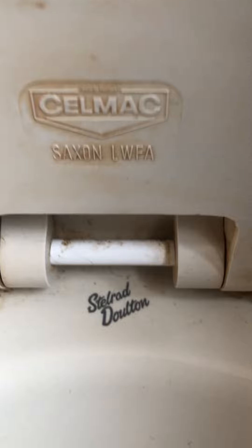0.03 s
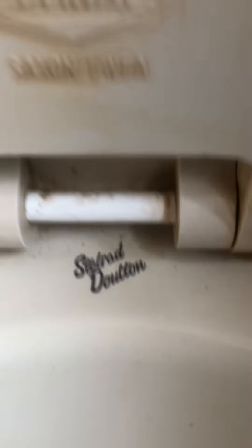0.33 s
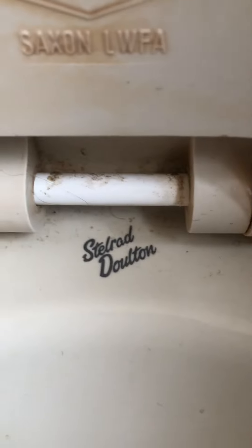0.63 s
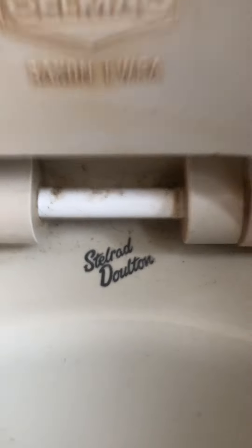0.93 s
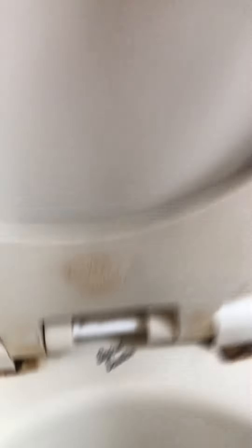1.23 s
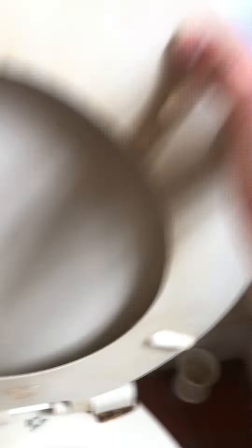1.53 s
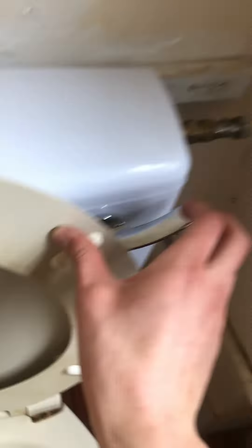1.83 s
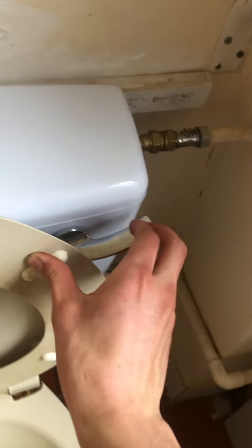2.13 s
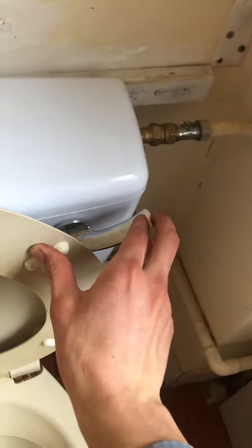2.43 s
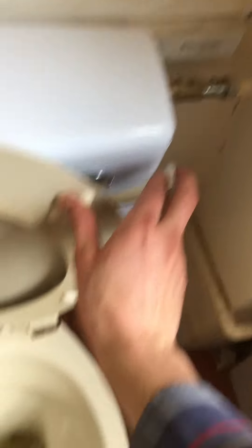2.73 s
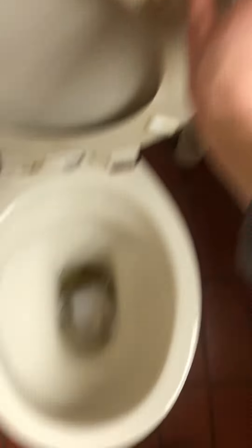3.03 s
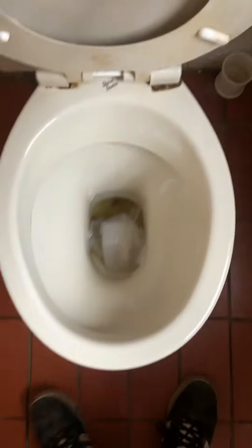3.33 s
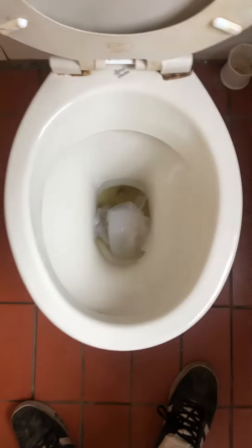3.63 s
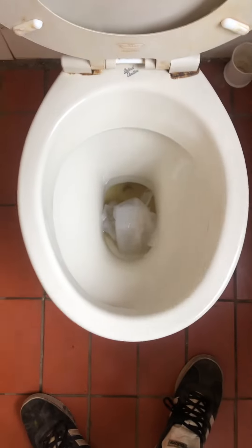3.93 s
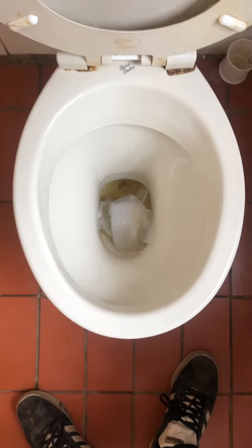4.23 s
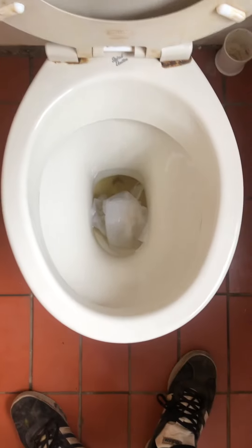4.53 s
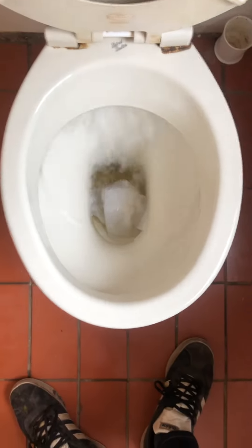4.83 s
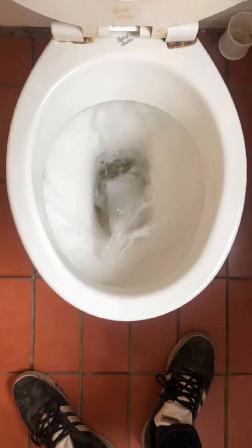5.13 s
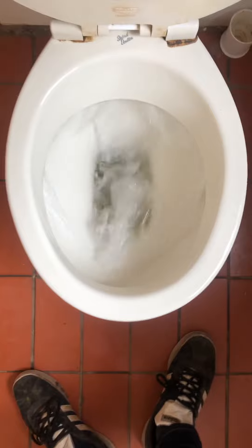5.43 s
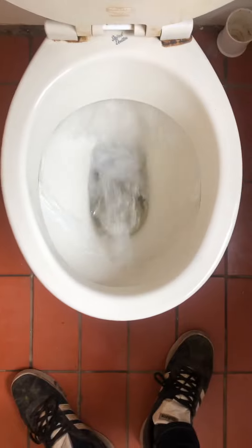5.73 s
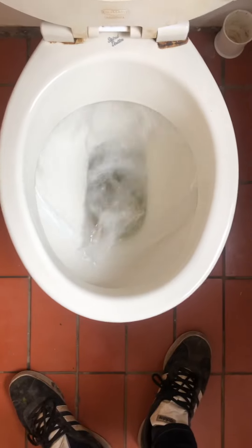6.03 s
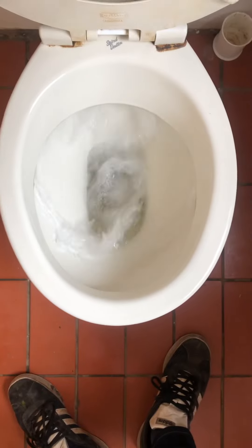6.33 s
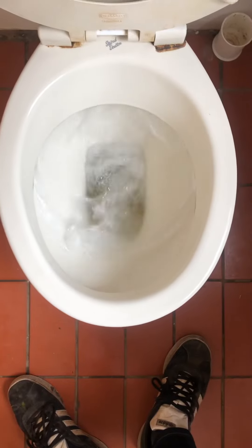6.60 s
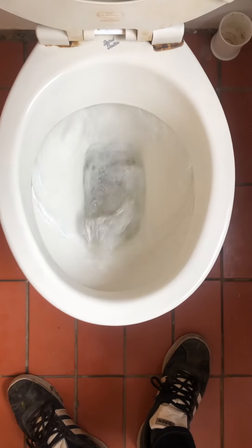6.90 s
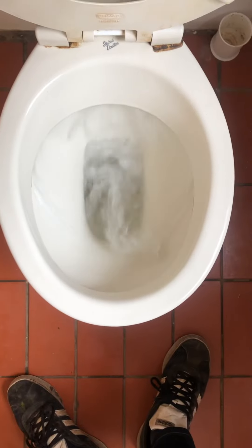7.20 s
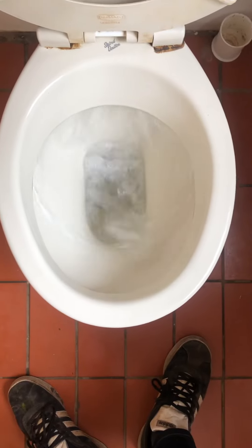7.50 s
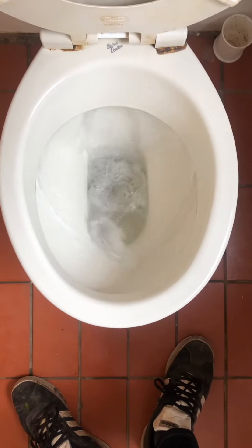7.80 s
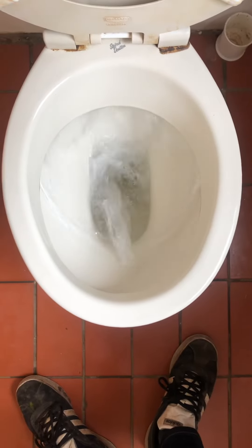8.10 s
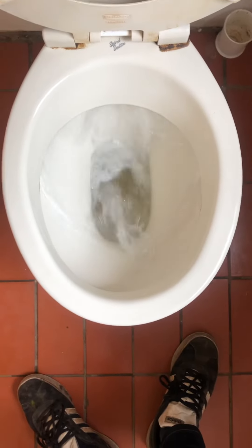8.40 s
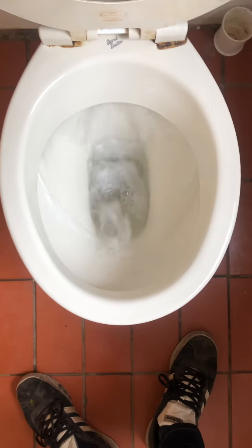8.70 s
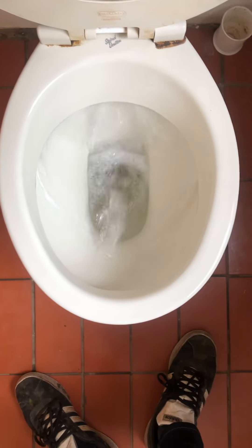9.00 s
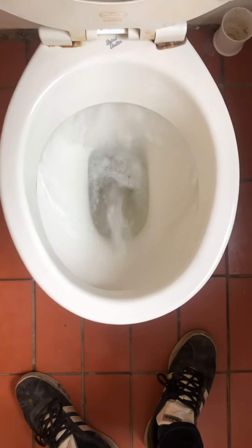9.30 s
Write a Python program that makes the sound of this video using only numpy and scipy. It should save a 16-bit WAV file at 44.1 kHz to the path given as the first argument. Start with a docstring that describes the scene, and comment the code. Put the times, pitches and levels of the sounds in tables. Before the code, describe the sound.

A toilet seat is raised with a short clatter, followed by a loud, gurgling flush in a small tiled room.

```python
"""A small tiled room with a toilet. A sleeve rustles as the plastic seat is lifted and knocks against
the cistern. Then the flush is pulled: the lever clicks, the mechanism clunks on the full tank, and air
rumbles and glugs out of the flush pipe. Water rushes round the china bowl, spraying from the rim,
churning into bubbles in the trap and sounding the bowl's hollow tone; it eases as the cistern drains."""
import sys
import numpy as np
from scipy import signal
from scipy.fft import rfft, irfft, next_fast_len
from scipy.io import wavfile
from scipy.ndimage import uniform_filter1d

SR = 44100
rng = np.random.default_rng(int(sys.argv[2]) if len(sys.argv) > 2 else 0)


def int16_out(signal):
    """Quantize to a 16-bit WAV file."""
    q = np.round(np.clip(np.atleast_2d(signal).T, -1, 1) * 32767)
    wavfile.write(sys.argv[1], SR, q.astype(np.int16))


N = 421155
TIME = np.arange(N) / SR


def amp(db):
    """Decibels to gain."""
    return 10 ** (np.asarray(db) / 20)


def unit(x):
    """Scales to rms 1."""
    return x / np.sqrt(np.mean(x ** 2) + 1e-20)


def peaked(x):
    """Scales to peak 1."""
    return x / abs(x).max()


def since(s):
    """Seconds gone by since time s; zero before it."""
    return np.maximum(TIME - s, 0)


def add(mix, s, sound):
    """Mixes a sound in at time s."""
    part = mix[max(round(s * SR), 0):][:len(sound)]
    part += sound[:len(part)]


def curve_at(points, hz):
    """Reads a curve on a log-frequency axis."""
    point_hz, value = np.transpose(points)
    return np.interp(np.log(hz + 1), np.log(point_hz), value)


def colour(x, eq):
    """Shapes a sound with an EQ curve; rms 1."""
    size = next_fast_len(len(x))
    gain = amp(curve_at(eq, np.fft.rfftfreq(size, 1 / SR)))
    return unit(irfft(rfft(x, size) * gain, size)[:len(x)])


def band(x, hz, kind="band"):
    """A gentle band-, low- or high-pass filter."""
    return signal.sosfilt(signal.butter(2, hz, kind, fs=SR, output="sos"), x)


def resonance(x, hz, width):
    """What a cavity picks out of a noise; rms 1."""
    nearby = band(x, [hz * 0.882, hz * 1.19])
    return unit(signal.lfilter(*signal.iirpeak(hz, hz / width, fs=SR), nearby))


def burst(t60):
    """A puff of noise that dies by 60 dB in t60 seconds."""
    t = np.arange(SR // 2) / SR
    return rng.standard_normal(len(t)) * amp(-60 * t / t60)


def ring(modes, detune):
    """Decaying modes of a struck body, each slightly detuned at random."""
    t = np.arange(SR // 2) / SR
    return sum(amp(db - 60 * t / t60) * np.sin(2 * np.pi * hz * (1 + detune * rng.standard_normal()) * t)
               for hz, db, t60 in modes)


def surge(rate, depth_db):
    """A gain that wanders at random, about rate times a second."""
    knots = rng.standard_normal(N // 64)
    return amp(depth_db * np.interp(TIME * rate, np.arange(len(knots)), knots))


def patchy(x, depth_db, bins):
    """Adds grain: lifts and drops random patches of the spectrum, each some 10 ms long."""
    spectra = signal.stft(x, nperseg=256)[2]
    patches = uniform_filter1d(rng.standard_normal(spectra.shape), bins, axis=0)
    patches = unit(uniform_filter1d(patches, size=4, axis=1))
    return signal.istft(spectra * amp(depth_db * patches), nperseg=256)[1][:N]


# The reverb of the tiles. Each row: frequency in Hz, time to fall 60 dB in seconds.
ROOM_DECAY = [(100, 0.48), (500, 0.66), (2000, 0.87), (6000, 0.83), (16000, 0.045)]


def room(x, wet_db):
    """Tiled walls: a dense tail, each band dying at its own speed."""
    echoes = rng.standard_normal(SR // 2) * (rng.random(SR // 2) < .15)
    echoes[:round(.004 * SR)] = 0  # pre-delay
    hz, t, spectra = signal.stft(echoes, SR, nperseg=256)
    decay = amp(-60 * t / curve_at(ROOM_DECAY, hz)[:, None])
    tail = signal.istft(spectra * decay, SR, nperseg=256)[1]
    return x + amp(wet_db) * signal.oaconvolve(x, tail / np.linalg.norm(tail))[:N]


# The dark tone of the room's air. Each row: frequency in Hz, gain in dB.
AIR_EQ = [(25, -29), (45, -2), (65, 2.5), (120, 2), (200, 0.5), (450, -5), (600, -9), (1000, -12),
          (1400, -18.5), (2500, -20.5), (4200, -22), (15000, -28.5)]


def room_tone(hum_hz=118.4):
    """Quiet room air with a faint hum."""
    air = colour(rng.standard_normal(N), AIR_EQ)
    hum = np.sqrt(2) * np.sin(2 * np.pi * hum_hz * TIME) * surge(3, depth_db=1.5)
    return amp(-66) * air + amp(-78) * hum


# The tone of rubbing cloth. Each row: frequency in Hz, gain in dB.
CLOTH_EQ = [(200, 3), (500, 7), (800, 4), (1100, 3.5), (1700, 2), (2400, 1.5), (2900, 1), (3500, 5),
            (6000, 3), (9000, -6), (16000, -16.5)]
# Swishes as the arm moves. Each row: fastest moment in seconds, level in dB, rise and fall in seconds,
# treble trim in dB, rasp trim in dB.
SLEEVE_STROKES = [(0.2, -67, 0.28, 0.67, -2, -14), (1.2, -44, 0.24, .14, -0.5, -14),
                  (1.43, -46.5, 0.18, 0.57, -7.5, -11), (1.85, -58, 0.33, 0.94, -2.5, -16),
                  (2.95, -65.5, .5, 0.85, -2.5, -16), (3.226, -55.5, 0.15, .14, 0.5, -1),
                  (3.44, -56, .01, 0.23, 7, -10), (3.55, -57, .15, 0.22, -3, 0.5),
                  (4.24, -64, 0.081, 0.29, -2, -14), (4.373, -35.5, 0.027, 0.18, -9.5, -23)]


def sleeve(swell_db=19):
    """Fibres slide over each other; each stroke climbs and drops swell_db over its rise and fall."""
    rub = colour(patchy(rng.standard_normal(N), depth_db=1.5, bins=6), CLOTH_EQ)
    body_power, treble_power, rasp_power = np.zeros((3, N))
    for s, db, rise, fall, treble_db, rasp_db in SLEEVE_STROKES:
        from_crest = np.maximum((s - TIME) / rise, (TIME - s) / fall)
        power = amp(db - swell_db * np.minimum(from_crest, 10)) ** 2
        body_power += power
        treble_power += power * amp(treble_db) ** 2
        rasp_power += power * amp(rasp_db) ** 2
    body = np.sqrt(body_power) * band(rub, 2730, "low")
    treble = np.sqrt(treble_power) * band(rub, 10300, "high")
    rasp = np.sqrt(rasp_power) * unit(band(rng.standard_normal(N), [2230, 4300]))  # weave pressed hard
    return body + amp(8) * treble + amp(-4.5) * rasp


# Sharp ticks. Each row: start in seconds, dry peak in dB, centre in Hz, 60 dB decay in seconds.
HARDWARE_CLICKS = [(0.889, -47, 7000, 0.041), (1.152, -29.5, 1990, 0.029), (1.181, -25.5, 4200, .03),
                   (1.2588, -28.5, 1880, 0.025), (1.3116, -26, 1660, 0.017), (1.318, -30.5, 3800, 0.056),
                   (1.387, -31.5, 6150, .035), (3.925, -48, 3700, 0.03), (4.351, -54, 6000, 0.043),
                   (4.369, -27.5, 6500, 0.029), (4.429, -20.5, 7560, .05), (4.487, -27, 9200, 0.044),
                   (4.597, -17, 2700, .04), (5.1424, -2, 11800, 0.009)]


def clicks():
    """Play in hinge, lever and valve takes up with short ticks."""
    out = np.zeros(N)
    for s, db, hz, t60 in HARDWARE_CLICKS:
        add(out, s, amp(db) * peaked(band(burst(t60), [hz * 0.6, hz * 1.4])))
    return room(out, wet_db=-13)


# Knocks of seat and hand. Each row: start in seconds, dry peak in dB, ring over thud in dB,
# thud pitch in Hz.
SEAT_KNOCKS = [(0.932, -44.5, 2, 200), (0.95, -47, -21, 76.5), (1.12, -35, -5, 280), (1.158, -27, 0, 282),
               (1.181, -26, 6, 110), (1.203, -21.5, 12, 190), (1.214, -27, 4, 130), (1.232, -24.5, 13, 189),
               (1.259, -19.5, 10, 170), (1.286, -27, 25, 100), (1.312, -21.5, 10, 190),
               (1.319, -24, 12, 242), (1.404, -33, -1, 149), (1.421, -40, -13, 119.6), (1.774, -46, -6, 85),
               (2.079, -49.5, -9, 130), (2.588, -48, -13, 227), (2.613, -47, -15, 153.6),
               (2.68, -53, -16, 151), (2.746, -43, -8, 270), (2.8, -52, -20, 247), (4.307, -45, -13, 253)]
# The seat's hollow ring. Each row: pitch in Hz, level in dB, 60 dB decay in seconds.
SEAT_MODES = [(198, 3.5, 0.11), (382, -21, 0.066), (501.5, 0.5, 0.14), (653, 2, 0.078), (780, 4.5, 0.057),
              (1053, -1, 0.11), (1630, -14, 0.1), (2225, -10, 0.097), (3100, -19, 0.25)]


def seat(clack_db=-6):
    """Each knock rings the seat; soft ones thud, hard ones ring with a plastic clack."""
    out = np.zeros(N)
    for s, db, ring_db, thud_hz in SEAT_KNOCKS:
        # each spot favours other modes
        modes = [(hz, mode_db + 2 * rng.standard_normal(), t60) for hz, mode_db, t60 in SEAT_MODES]
        hollow = peaked(ring(modes, detune=.008) + .6 * band(burst(.06), [350, 1500]))
        thud = peaked(band(burst(.13), [thud_hz * .55, thud_hz * 1.7]))
        clack = peaked(band(burst(.04), [1400, 2700]))
        add(out, s, amp(db) * peaked(thud + amp(ring_db) * (hollow + amp(clack_db) * clack)))
    return room(out, wet_db=-8)


def bubble(hz, cycles, rise):
    """An air bubble swells into ringing and climbs in pitch as it nears the surface."""
    age = np.arange(int(3 * cycles / hz * SR)) / SR * hz / cycles
    envelope = (1 - np.exp(-8 * age)) * np.exp(-2 * age)
    return peaked(envelope * np.sin(2 * np.pi * cycles * (age + rise * age ** 2 / 2)))


# Single bubbles that stand out. Each row: time in seconds, level in dB, pitch in Hz.
GLUG_BUBBLES = [(4.371, -30.5, 244), (4.51, -27, 201), (4.534, -17, 290), (4.559, -13.5, 386),
                (4.62, -13, 305), (4.636, -21.5, 212), (4.674, -13, 467), (4.733, -23, 263),
                (4.827, -13.5, 394), (5.081, -14, 406), (5.084, -14, 287), (5.389, -18, 600),
                (5.749, -44, 150), (6.066, -15, 3390), (6.359, -46, 162), (6.758, -21, 668),
                (6.809, -23, 530), (6.861, -21.5, 3070), (6.897, -16, 3930), (7.212, -25, 558),
                (7.26, -22.5, 625), (7.681, -25.5, 680), (7.81, -18.5, 476), (7.971, -43, 199),
                (8.107, -21.5, 443), (8.291, -20.5, 1010), (8.345, -22.5, 800), (8.577, -28, 422)]


def glugs(shed_within_s=.03):
    """Bubbles break away in pipe and trap, each shedding three smaller, higher ones."""
    out = np.zeros(N)
    for s, db, hz in GLUG_BUBBLES:
        add(out, s - .002, amp(db - 4.5) * bubble(hz, cycles=9.5, rise=0.034))
        for delay, pitch in rng.random((3, 2)):
            small = bubble(hz * (1 + 2 * pitch), cycles=7.9, rise=0.035)
            add(out, s + delay * shed_within_s, amp(db - 13) * small)
    return room(out, wet_db=-6)


# The mechanism hits its stop and rebounds. Each row: start in seconds, level in dB.
MECHANISM_CLUNKS = [(4.4275, -11.5), (4.457, -22), (4.556, -29), (4.612, -24)]
# The tank's ring. Each row: pitch in Hz, level in dB, 60 dB decay in seconds.
CISTERN_MODES = [(104, -19, 0.55), (338, -13, .25), (458.6, 0.5, 0.31), (493, -13, 0.35), (541, -16, 0.47),
                 (840, 2.5, 0.11), (865, 1, 0.062), (1190, -20.5, 0.19), (1464, -27, 0.084),
                 (3120, -26, 0.2), (4190, -12.5, 0.069), (5556, -25, 0.16), (6800, -31, .16),
                 (10100, -18, 0.095)]


def cistern(attack_s=.004):
    """The flush mechanism strikes the water-filled tank, which takes a moment to swing."""
    out = np.zeros(N)
    for s, db in MECHANISM_CLUNKS:
        rattle = amp(1) * band(burst(0.11), [500, 1300])  # loose parts of the linkage
        clunk = rattle + ring(CISTERN_MODES, detune=.002)
        attack = np.minimum(TIME[:len(clunk)] / attack_s, 1)
        add(out, s, amp(db) * clunk * attack)
    return room(out, wet_db=-7.5)


OPEN_S, FULL_S = 4.43, 5.62  # the valve opens; the rim runs full
# The flush pipe's low shudder. Each row: frequency in Hz, gain in dB.
PIPE_EQ = [(25, -17.5), (45, -8), (65, 7), (105, 2), (135, 2), (200, 13.5), (260, 0), (500, -23),
           (1500, -60)]


def pipe(attack_s=0.056, clear_s=5.11, sag_db_per_s=4.5, release_db_per_s=130):
    """Water drives the air out of the pipe with a lumpy rumble that stops once the air is gone."""
    shake_db = -36.5 - sag_db_per_s * since(OPEN_S) - release_db_per_s * since(clear_s)
    attack = np.minimum(since(OPEN_S) / attack_s, 1)
    rumble = unit(colour(rng.standard_normal(N), PIPE_EQ) * surge(25, depth_db=3.5))
    return rumble * attack * amp(shake_db)


# Gushes that break over the pool and gulp in the trap. Each row: start in seconds, rise in seconds,
# rim level in dB, trap level in dB.
WATER_GUSHES = [(4.593, 0.022, -25, -26), (5.07, 0.04, -32, -46), (5.35, 0.035, -34, -29),
                (5.58, 0.043, -38, -32), (6.5, .06, -33.5, -46), (6.72, 0.078, -43, -52),
                (7.18, 0.095, -41, -34), (7.71, 0.056, -37, -30), (8.07, 0.056, -35.5, -38.5),
                (8.9, 0.02, -33.5, -43), (9.23, 0.021, -38, -30.5), (9.45, 0.034, -34, -55)]


def water_flow(settle_db=5, settle_s=1.0, trap_attack_s=0.067):
    """Gains for rim and trap: the rim fills slowly, the trap fast; both ease as the cistern drains."""
    head_db = -settle_db * (1 - np.exp(-since(FULL_S) / settle_s))
    rim_fill = np.minimum(since(OPEN_S) / (FULL_S - OPEN_S), 1) ** 0.54
    trap_fill = np.minimum(since(OPEN_S) / trap_attack_s, 1)
    rim_power = (rim_fill * amp(-30 + head_db)) ** 2
    trap_power = (trap_fill * amp(-31 + 0.62 * head_db)) ** 2
    for s, rise, rim_db, trap_db in WATER_GUSHES:
        age = since(s) / rise
        gush = age * np.exp(1 - np.minimum(age, 20))  # quick swell, slower ebb
        rim_power += (amp(rim_db) * gush) ** 2
        trap_power += (amp(trap_db) * gush) ** 2
    return np.sqrt(rim_power), np.sqrt(trap_power)


def impacts(rate, spread_db):
    """Random impulses, many small and a few large."""
    hits = (rng.random(N) < rate / SR) * rng.choice([-1, 1], N)
    return hits * amp(spread_db * np.minimum(rng.exponential(1, N), 4))


# The bright wash of the spray. Each row: frequency in Hz, gain in dB.
SPRAY_EQ = [(100, -60), (300, -41), (700, -9), (1500, 1.5), (2400, 1.5), (3500, 2), (4500, -1), (6000, 1.5),
            (8000, -0.5), (11000, 0), (16000, -5)]


def spray(flow):
    """The sheet of water from the rim breaks into drops over a fine hiss."""
    splat = burst(0.009)[:SR // 100]  # a drop spatters for a few milliseconds
    drop_power = signal.oaconvolve(impacts(1100, spread_db=3.5) ** 2, splat ** 2)[:N]
    spatter = np.sqrt(abs(drop_power)) * rng.standard_normal(N)
    drops = unit(patchy(spatter, depth_db=3.5, bins=10))
    hiss = unit(patchy(rng.standard_normal(N), depth_db=2.5, bins=8))
    water = colour((drops + amp(-1) * hiss) * surge(70, depth_db=0.84), SPRAY_EQ)
    return amp(1.6) * unit(room(water, wet_db=-12)) * surge(13, depth_db=0.62) * flow


def bubble_swarm(low_hz, high_hz, cycles, spread_db, count):
    """Bubbles of all sizes scattered over the length of the flush; rms 1."""
    swarm = np.zeros(N)
    for when, pitch, strength, life in rng.random((count, 4)):
        hz = low_hz * (high_hz / low_hz) ** pitch
        s = OPEN_S + when * (TIME[-1] - OPEN_S)
        db = spread_db * min(-np.log(strength), 3)
        add(swarm, s, amp(db) * bubble(hz, cycles * (.5 + life), rise=.03))
    return unit(swarm)


# The throaty tone of the trap. Each row: frequency in Hz, gain in dB.
CHURN_EQ = [(40, -50), (90, -33), (150, -22), (230, 1.5), (350, -1), (450, -18), (560, 1.5), (850, 6),
            (970, 4.5), (1100, 5.5), (1500, 8.5), (1950, 3), (2400, 6.5), (4000, -10), (8000, -26),
            (16000, -40)]
# Air resonances of the bowl. Each row: centre in Hz, width in Hz, level in dB.
BOWL_RESONANCES = [(458, 270, 0), (695, 15, -12.5), (823, 16, -7.5)]


def churn(flow):
    """The streams meet in the trap and fold in air: a swarm of bubbles that also sounds the bowl."""
    swarm = bubble_swarm(360.5, 4655, cycles=8.7, spread_db=4.5, count=6500)
    froth = swarm + amp(3) * rng.standard_normal(N)
    froth = room(froth * surge(30, depth_db=1.7), wet_db=-9.5)
    hollow = sum(amp(db) * resonance(froth, hz, width) for hz, width, db in BOWL_RESONANCES)
    return (amp(-5.5) * colour(froth, CHURN_EQ) + amp(-16.5) * hollow) * surge(9, depth_db=0.5) * flow


def slosh(flow):
    """The pool heaves slowly under the streams."""
    heave = unit(band(rng.standard_normal(N), [148, 238]))
    return amp(-33) * heave * surge(3, depth_db=2) * flow


def plinks(flow):
    """Small bubbles at the surface ring briefly above the rush."""
    small = bubble_swarm(1400, 7500, cycles=20, spread_db=4.5, count=600)
    return amp(-10) * room(small, wet_db=-11) * flow


# The fader ride on the bowl's hollow tone as water pours in. Each row: time in seconds, level in dB.
BOOM_FADER = [(4.45, -40), (4.58, -31), (5.06, -44.5), (5.09, -47), (5.19, -41), (5.54, -55), (5.9, -42),
              (6.38, -59), (6.62, -46), (7.64, -51), (7.7, -37), (8.03, -49.5), (8.11, -40), (8.26, -57),
              (8.36, -41.5), (9.04, -47.5), (9.51, -42), (9.55, -50)]


def bowl_boom():
    """The lowest air resonance of the bowl drones, over a broader wallowing of the water."""
    drone = resonance(rng.standard_normal(N), hz=300, width=10)
    swing = abs(signal.hilbert(drone))
    drone = unit(drone / np.sqrt(2 + swing ** 2))  # losses grow with the swing and steady it
    wallow = resonance(rng.standard_normal(N), hz=278, width=23)
    times, db = np.transpose(BOOM_FADER)
    return (drone + amp(-7.5) * wallow) * amp(np.interp(TIME, times, db, left=-120))


# Wet slaps above the rush. Each row: start in seconds, level in dB, treble trim in dB.
WATER_SLAPS = [(4.5979, -6, -3), (4.611, -13, -27), (4.8035, -13, 3), (4.8903, -26, -7), (4.9114, -11, -15),
               (4.9443, -10.5, -7), (5.28, -12, -10), (6.0637, -15.5, -14), (6.48, -12.5, 3),
               (7.7442, -19, -15), (7.7643, -30, -17), (7.8003, -15, -6), (8.766, -12, 5),
               (9.0035, -19.5, -11)]


def splashes():
    """Slugs of water slap the china and scatter."""
    out = np.zeros(N)
    for s, db, treble_db in WATER_SLAPS:
        slap = burst(.055)
        body = band(slap, [900, 4500])
        treble = amp(treble_db + 3.5) * band(slap, 2900, "high")
        add(out, s, amp(db - 0.5) * peaked(body + treble))
    return room(out, wet_db=-12)


def scene():
    """Everything at one microphone above the bowl."""
    handling = sleeve() + clicks() + seat()
    rim, trap = water_flow()
    release = glugs() + cistern() + pipe()
    rush = spray(rim) + churn(trap) + slosh(trap) + plinks(rim) + bowl_boom() + splashes()
    return (room_tone() + handling + release + rush)[None]


def record(dry, low_cut_hz=50, high_cut_hz=16050):
    """A small microphone loses the deepest bass; a steep filter takes off the very top."""
    thin = signal.sosfilt(signal.butter(4, low_cut_hz, "high", fs=SR, output="sos"), dry)
    high_cut = signal.firwin(511, high_cut_hz, window=("kaiser", 9), fs=SR)
    return signal.oaconvolve(thin, high_cut[None], "same")


dry = scene()
out = record(dry)
int16_out(out)
```